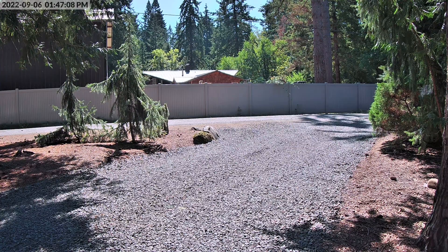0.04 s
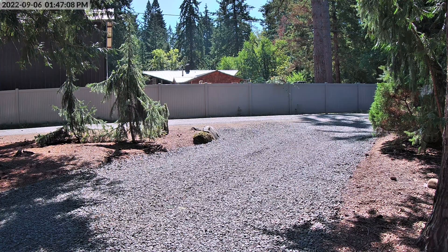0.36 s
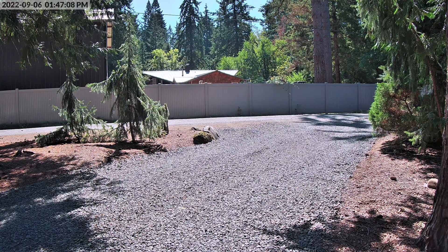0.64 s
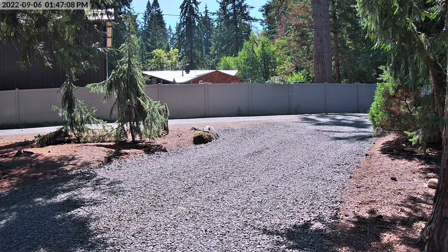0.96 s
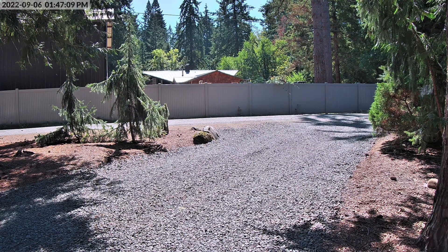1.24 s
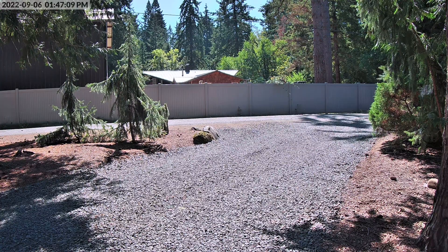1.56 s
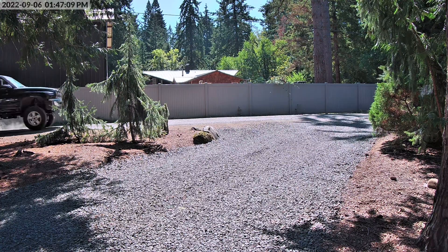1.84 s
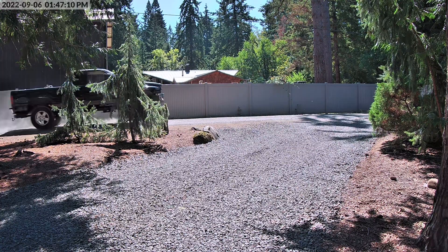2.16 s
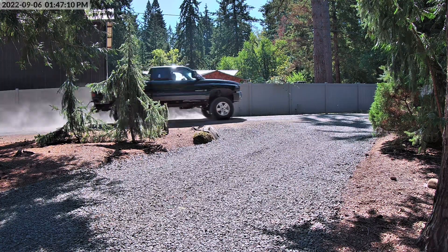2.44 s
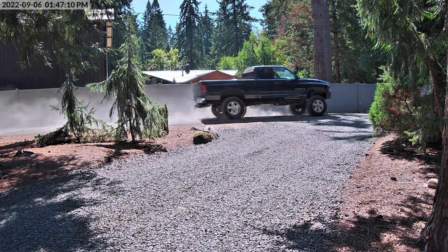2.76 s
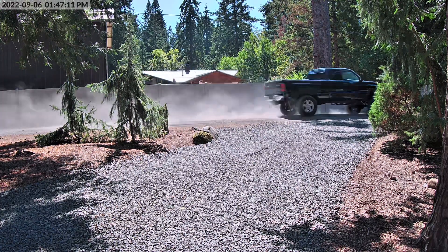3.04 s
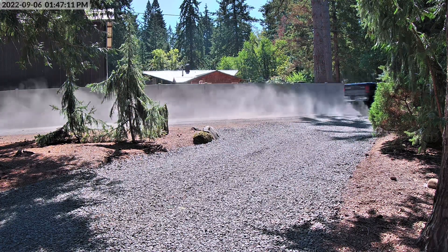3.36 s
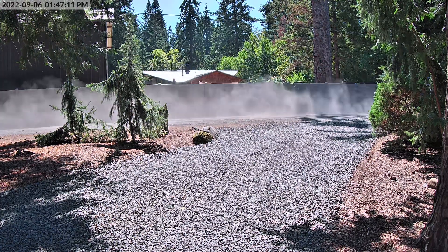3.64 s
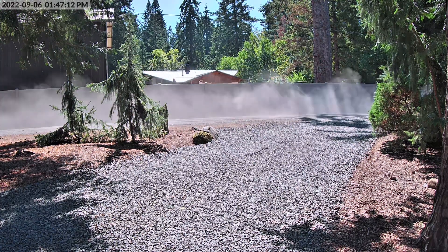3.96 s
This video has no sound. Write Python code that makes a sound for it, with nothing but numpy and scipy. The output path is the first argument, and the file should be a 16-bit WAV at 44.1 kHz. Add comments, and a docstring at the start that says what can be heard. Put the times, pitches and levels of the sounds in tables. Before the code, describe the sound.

A pickup truck accelerates on gravel, its loud exhaust booming unevenly over crunching tyres, with a slight outdoor echo. Just after 2 seconds the engine eases and drops in pitch. From about 2.4 to 2.8 seconds it revs sharply as it passes, the exhaust rasping and cracking. From 3 seconds the crunch dies away and a low exhaust drone fades into a distant rumble by 4 seconds.

```python
"""A V8 pickup with a loud exhaust accelerates along a gravel road, past a fixed camera that cuts the treble.
At first uneven firings boom in the pipe and tyres crunch on stones, echoed by fence and trees.
Just after 2 s the driver lifts, then stabs the throttle; from 2.4 s to 2.8 s the tailpipe faces the
camera and its gas pulses rasp and crack. Last, a pipe resonance drones as the truck fades away
into a distant rumble."""
import sys
import numpy as np
from scipy import signal
from scipy.fft import rfft, irfft
from scipy.io import wavfile
from scipy.ndimage import uniform_filter1d

SR = 44100
rng = np.random.default_rng(int(sys.argv[2]) if len(sys.argv) > 2 else 0)


def master(y):
    """Save y as 16-bit WAV."""
    cut = np.clip(np.atleast_2d(y).T, -1, 1)
    pcm = np.round(cut * 32767)  # scale
    wavfile.write(sys.argv[1], SR, pcm.astype(np.int16))


N = 176400


def firings():
    """Cyclic modulation: eight cylinders, unequal in timing and strength, lope. Gives times and sizes."""
    # engine speed: t/s, f/Hz of the eight-firing cycle
    speed = [(0.0, 22.55), (0.15, 23.5), (0.32, 23.55), (0.46, 25.65), (0.56, 25.4), (0.63, 22.45),
             (0.72, 22.9), (0.79, 20.0), (0.9, 22.95), (0.97, 20.35), (1.1, 23.0), (1.3, 23.25),
             (1.7, 22.9), (1.85, 23.35), (1.98, 24.3), (2.06, 23.5), (2.17, 18.15), (2.3, 16.3),
             (2.38, 16.85), (2.46, 20.7), (2.53, 25.35), (2.6, 25.25), (2.72, 24.8), (2.86, 19.05),
             (3.0, 18.95), (3.2, 18.45), (3.5, 18.75), (3.75, 18.55), (4.0, 18.5)]
    # in firing order, at full lope: lag/firing intervals, level/dB when steady; the same two when revving
    cylinders = [(.05,-.6,.13,.8),(.22,-5.3,.12,-5.5),(.06,-11.8,.08,-12.5),(.13,-3.8,.18,-2.7),(-.11,-14.4,-.15,-12.5),(-.02,-6.7,.05,-6.4),(.12,-3.4,.13,-5.1),(-.07,-6.8,-.17,-5.9)]
    # engine state: t/s, share of revving/1, roughness factor/1
    running = [(0,.6,1),(.3,1,1.6),(.6,0.95,1.8),(1.05,0.95,0.51),(1.3,0,0.77),(1.85,0.03,0.39),(2.05,0,.5),(2.3,0.4,0.88),(2.5,0.91,0.69),(2.8,0.88,0.88),(4,1,0.55)]
    # depth of the lope, which smooths under steady load: t/s, share/1
    lope = [(0,1),(1.65,0.99),(1.8,0.6),(1.95,0.71),(2.1,1),(2.5,0.99),(4,1)]
    coast_hz, pull_hz, coast_lump = 17.4, 19, 0.53  # the firings even out when the engine coasts
    scatter_db, jitter_s = 2.3, .0001  # standard deviations at roughness 1
    hz, count = curve(speed), len(cylinders)
    t = np.arange(N) / SR
    slots = np.cumsum(hz) * count / SR  # firing intervals elapsed
    k = np.arange(int(slots[-1]))
    when = np.interp(k, slots, t)
    state_s, revving, rough = np.array(running).T
    revving = np.clip(np.interp(when, state_s, revving), 0, 1)
    rough = np.interp(when, state_s, rough)
    lump = np.interp(np.interp(k, slots, hz), [coast_hz, pull_hz], [coast_lump, 1])
    lump *= np.interp(when, *np.array(lope).T)
    pattern = np.array(cylinders)[k % count].T
    lag, db = (pattern[:2] * (1 - revving) + pattern[2:] * revving) * lump
    jitter, scatter = rng.standard_normal((N // 100, 2))[:len(k)].T * rough
    times = np.interp(k + lag, slots, t) + jitter_s * jitter
    return times, undb(db + scatter_db * scatter) * np.sqrt(lump)


def exhaust(pulses):
    """Source and filter: firings ring the pipe's modes; three bands swell with throttle and direction."""
    # pipe response: f/Hz, relative level/dB
    pipe_colour = [(25,-30.5),(48,-17.5),(68,-3),(92,-19),(116,-5),(160,-1.5),(188,2),(233,-5.5),(275,4),(303,1.5),(365,-2),(415,0.5),(445,-6.5),(490,-19.5),(560,-11),(640,-22),(1100,-26),(2500,-68)]
    # deep throb, middle boom and upper bark: t/s, relative level/dB
    throb_level = [(0,-36.5),(.37,-35.5),(.5,-44.5),(1.3,-38),(1.8,-41.5),(2.05,-43.5),(2.2,-50),(2.7,-52),(2.9,-56),(4,-54)]
    boom_level = [(0,-24.5),(.09,-23.5),(.17,-32),(.21,-25.5),(.41,-22),(.52,-29),(.61,-23.5),(.75,-34),(.81,-21.5),(.97,-23.5),(1.07,-20),(1.14,-32.5),(1.31,-23),(1.65,-28),(1.799,-18),(1.95,-25),(2.05,-25),(2.11,-28),(2.24,-29.5),(2.33,-25.5),(2.41,-30.5),(2.44,-21.5),(2.56,-26.5),(2.73,-32),(2.85,-32),(3.2,-41.5),(3.5,-51.5),(4,-47.5)]
    bark_level = [(0.0, -32.5), (0.28, -23.5), (0.31, -29.5), (0.4, -20.5), (0.53, -36), (0.71, -24),
                  (0.77, -52), (0.85, -25.5), (0.97, -35), (1.04, -25), (1.1, -27), (1.63, -25),
                  (1.84, -28.5), (2.05, -27), (2.18, -40.5), (2.42, -39), (2.45, -23.5), (2.77, -21),
                  (2.8, -35), (3.33, -47.5), (3.36, -45.5), (3.77, -52), (3.91, -46), (4.0, -63)]
    pipe = -colour(pulses, pipe_colour)
    deep, body = lows(pipe, hz=92), lows(pipe, hz=222)
    throb = hold(deep) * undb(curve(throb_level) - 2)
    boom = hold(body - deep) * undb(curve(boom_level) - 1.5)
    bark = hold(pipe - body) * undb(curve(bark_level) - 1.5)
    return throb + boom + bark


def gas(pulses):
    """Turbulent jet noise: each firing cracks at the tailpipe and blows a decaying puff of gas."""
    # gas rasp, midrange roar, and cracks (loud while the tailpipe faces the camera): t/s, level/dB
    rasp_level = [(0,-46.5),(.4,-44),(.6,-49.5),(1.05,-48),(1.2,-36.5),(1.8,-46),(2.04,-33),(2.2,-54.5),(2.415,-59),(2.43,-29),(2.47,-36),(2.51,-28),(2.73,-30),(2.78,-35.5),(2.82,-50.5),(3,-62),(4,-69.5)]
    roar_level = [(0,-36.5),(.38,-33.5),(.6,-37),(1.1,-37.5),(1.8,-45),(2.05,-41),(2.25,-49.5),(2.6,-52.5),(2.9,-48),(3.4,-58.5),(4,-58.5)]
    crack_level = [(0,-59),(2,-46),(2.4,-69.5),(2.45,-32),(2.51,-32),(2.74,-30.5),(2.81,-54),(4,-76)]
    # their spectra: f/Hz, relative level/dB
    rasp_colour = [(200,-24.5),(500,-10),(1100,-7),(1400,-0.5),(1750,-15.5),(2300,1.5),(2750,-3),(3000,-4.5),(3300,-13.5),(5000,-27),(7000,-30),(9000,-52)]
    roar_colour = [(25,-29),(70,-10),(150,3.5),(280,5.5),(420,-0.5),(520,3),(720,6),(1000,-2),(2000,-44)]
    crack_colour = [(200,-13.5),(450,4),(800,-5),(1400,1.5),(1800,-15.5),(2400,-3.5),(2750,3.5),(3300,-12),(5000,-20),(9000,-48.5)]
    decay_s, steady_flow = 0.0061, 0.61
    flow = unit(signal.lfilter([1], [1, -np.exp(-1 / (decay_s * SR))], pulses)) + steady_flow
    rasp = colour(flow * rng.standard_normal(N), rasp_colour) * undb(curve(rasp_level))
    roar = colour(flow * rng.standard_normal(N), roar_colour) * undb(curve(roar_level))
    crack = colour(pulses, crack_colour) * undb(curve(crack_level))
    return rasp + roar - crack


def drone(pulses):
    """Forced resonance: the firings drive a narrow tailpipe mode that hums behind the truck."""
    # hum as the truck drives off: t/s, level/dB
    drone_level = [(0,-71),(2.8,-63),(2.96,-34),(3.2,-49.5),(3.42,-42.5),(3.6,-45),(3.74,-54),(3.95,-39),(4,-51)]
    mode_hz = 243.9
    b, a = signal.iirpeak(mode_hz, Q=59, fs=SR)
    ringing = signal.lfilter(b, a, signal.lfilter(b, a, pulses))
    return hold(ringing) * undb(curve(drone_level))


def gravel():
    """Friction and shot noise: tyres grind a wash of grit and strike single stones at random."""
    # tyres on the stones: t/s, relative level/dB
    tyre_level = [(0,-49),(.39,-44.5),(.6,-47),(1.25,-45),(1.5,-45.5),(1.87,-44.5),(2.04,-41),(2.14,-50.5),(2.32,-57),(2.4,-51),(2.49,-48.5),(2.52,-40.5),(2.57,-49),(2.64,-45),(2.69,-43.5),(2.75,-54.5),(2.83,-56),(3,-63.5),(4,-75)]
    # spectrum of the crunch: f/Hz, relative level/dB
    tyre_colour = [(290, -44.5), (500, -8), (557, -5), (660, -20.5), (862, -11), (1050, -10.5), (1410, -10),
                   (1660, -11.5), (2620, -8), (3030, -15), (3340, -16.5), (5750, -25), (7150, -32),
                   (8070, -44), (9000, -47), (11700, -93.5), (19800, -120)]
    # top treble against the rest: t/s, level/dB
    sparkle = [(0,-7),(1,-3.5),(1.7,-2.5),(2.7,2),(3,0.5),(4,7)]
    stones_per_s, spread_db, stone_db = 820, 3.5, -7.5
    grit = rng.standard_normal(N)
    hits = rng.random(N) < stones_per_s / SR
    stones = hits * np.sign(grit) * undb(spread_db * np.minimum(rng.exponential(size=N), 5))
    crunch = colour(grit + undb(stone_db) * unit(stones), tyre_colour) * undb(curve(tyre_level) + 8.5)
    dull = lows(crunch, hz=5400)
    return dull + (crunch - dull) * undb(curve(sparkle))


def trees(x):
    """Scattering: fence and trunks return a decaying echo, whose share is greater when the truck is far."""
    # echo against direct sound: t/s, level/dB
    echo_level = [(0,-8.5),(.7,-6.5),(1.5,-3.5),(2.6,-21.5),(3,-6.5),(4,-4.5)]
    t60_s, delay_s = .35, .015
    t = np.arange(SR // 2) / SR
    tail = rng.standard_normal(len(t)) * np.exp(-np.log(1000) * t / t60_s) * (t > delay_s)
    echo = signal.fftconvolve(x, tail / np.linalg.norm(tail))[:N]
    wet = undb(curve(echo_level))
    return (x + wet * echo) / np.sqrt(1 + wet ** 2)


def rumble():
    """Diffuse field: steady low noise from far away."""
    # background spectrum: f/Hz, relative level/dB
    far_colour = [(25,-16),(55,-11.5),(85,-6.5),(120,-1.5),(220,4.5),(340,-6.5),(520,-27),(1000,-29),(1700,-27),(2250,-19),(3000,-24.5),(5000,-31.5),(8000,-55.5)]
    return undb(-45) * colour(rng.standard_normal(N), far_colour)


def undb(db):
    """Decibels to amplitude ratio."""
    return 10 ** (np.asarray(db) / 20)


def curve(table):
    """Linear interpolation through (t/s, value) rows."""
    return np.interp(np.arange(N) / SR, *np.array(table, float).T[:2])


def unit(x):
    """Normalisation to rms 1."""
    return x / np.sqrt(np.mean(x ** 2))


def hold(x):
    """Normalisation to a running rms of 1."""
    power = uniform_filter1d(uniform_filter1d(x ** 2, size=SR // 12), size=SR // 12)
    return x / np.sqrt(np.abs(power) + 1e-18)


def colour(x, points):
    """Minimum-phase filtering by (f/Hz, level/dB) rows; output rms 1."""
    size = 8192
    hz, db = np.array(points, float).T
    log_f = np.log(np.maximum(np.arange(size // 2 + 1) * SR / size, 1))
    cepstrum = irfft(np.log(undb(np.interp(log_f, np.log(hz), db))))
    cepstrum[1:size // 2] *= 2  # folding onto positive time makes the filter causal
    cepstrum[size // 2 + 1:] = 0
    response = irfft(np.exp(rfft(cepstrum)))
    return unit(signal.fftconvolve(x, response)[:N])


def lows(x, hz):
    """Zero-phase low-pass: the part of x below a steep edge."""
    return signal.sosfiltfilt(signal.butter(4, hz, fs=SR, output="sos"), x)


def clicks(times, sizes):
    """Fractional delay: each impulse is shared between two samples."""
    at = np.clip(times * SR, 0, N - 1)
    i = at.astype(int)
    return (np.bincount(i, sizes * (1 - at + i), N + 1) + np.bincount(i + 1, sizes * (at - i), N + 1))[:N]


def scene():
    """Superposition: the truck and its echoes over the distant rumble."""
    times, sizes = firings()
    pulses = clicks(times, sizes)
    gas_pulses = clicks(times, sizes ** 0.82)  # the puffs vary less than the firings
    truck = exhaust(pulses) + drone(pulses) + gas(gas_pulses) + gravel()
    return (trees(truck) + rumble())[None]


def record(dry):
    """Band limiting: the camera cuts the treble steeply."""
    top_hz = 8700
    return signal.sosfilt(signal.ellip(8, .2, 70, top_hz, fs=SR, output="sos"), dry)


dry = scene()
out = record(dry)
master(out)
```